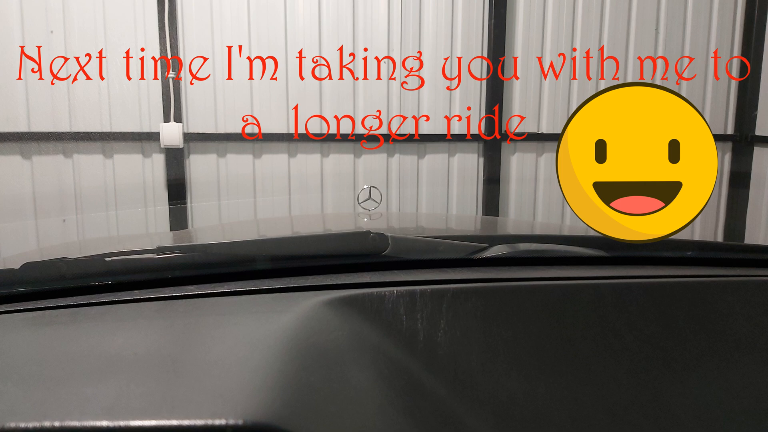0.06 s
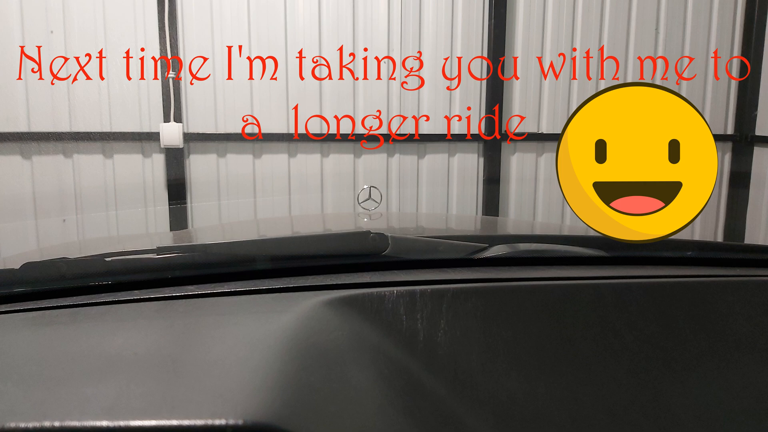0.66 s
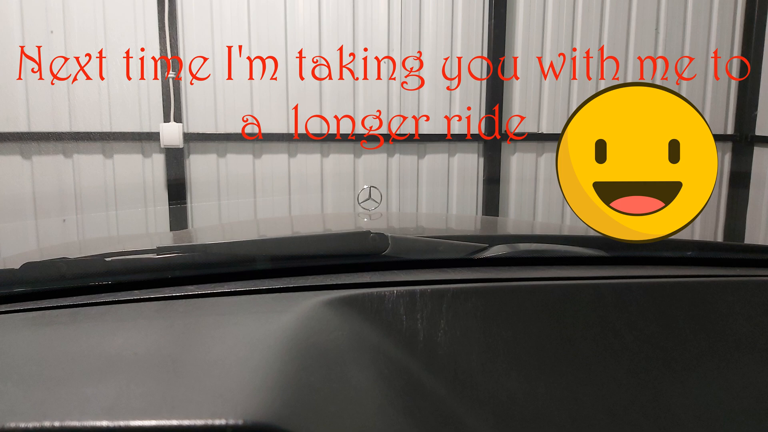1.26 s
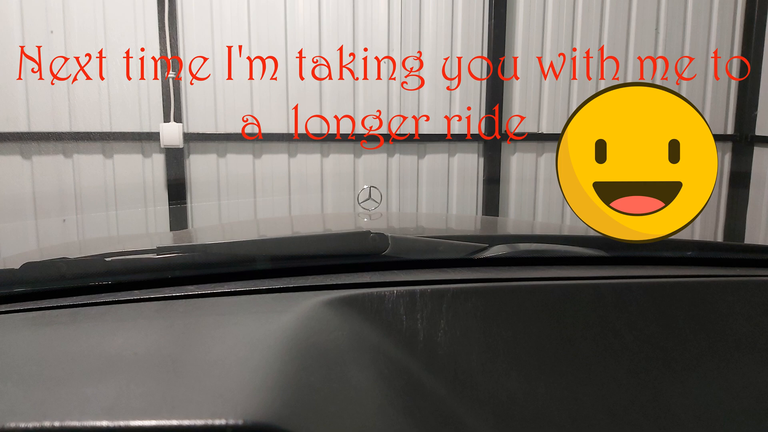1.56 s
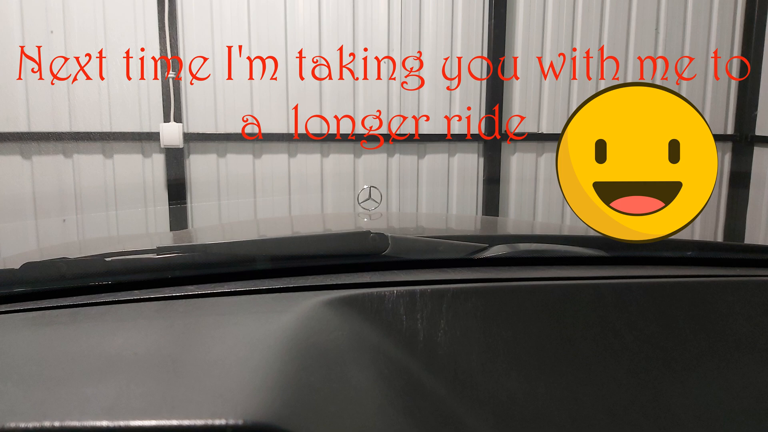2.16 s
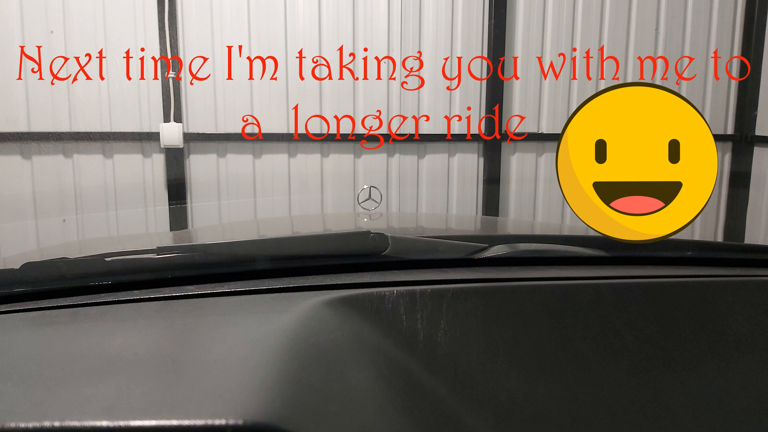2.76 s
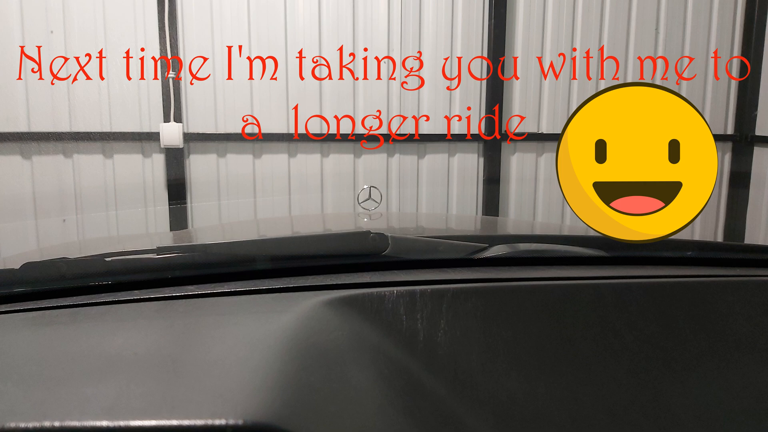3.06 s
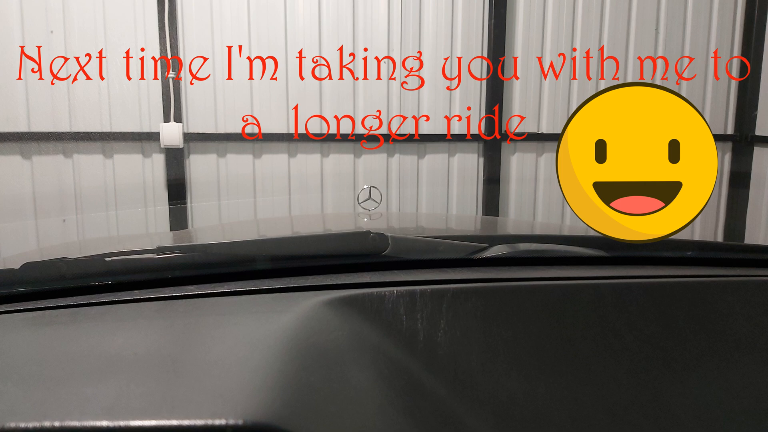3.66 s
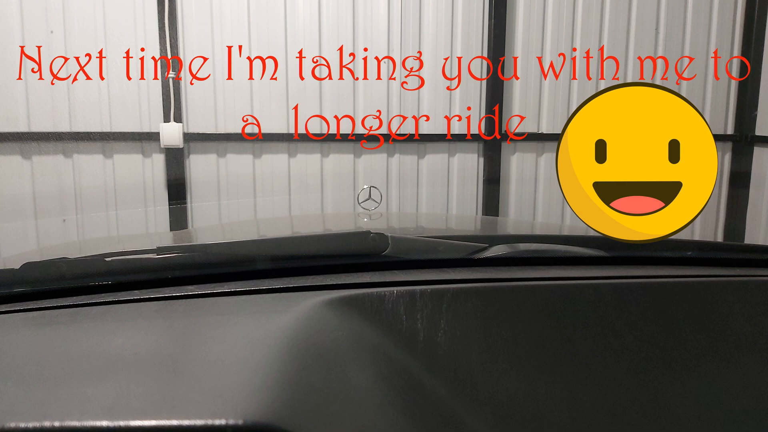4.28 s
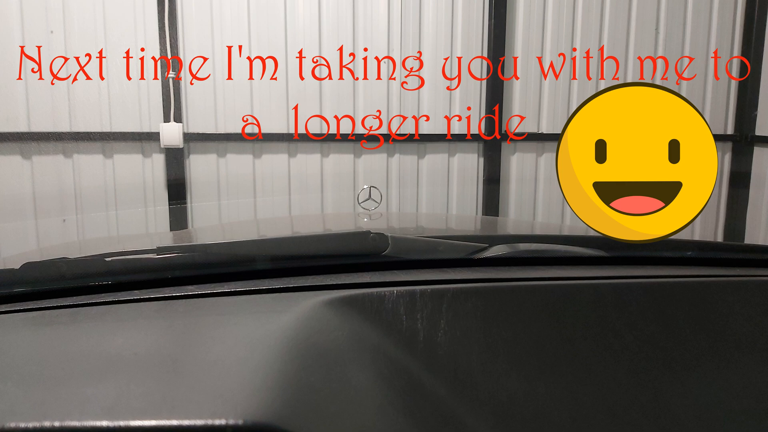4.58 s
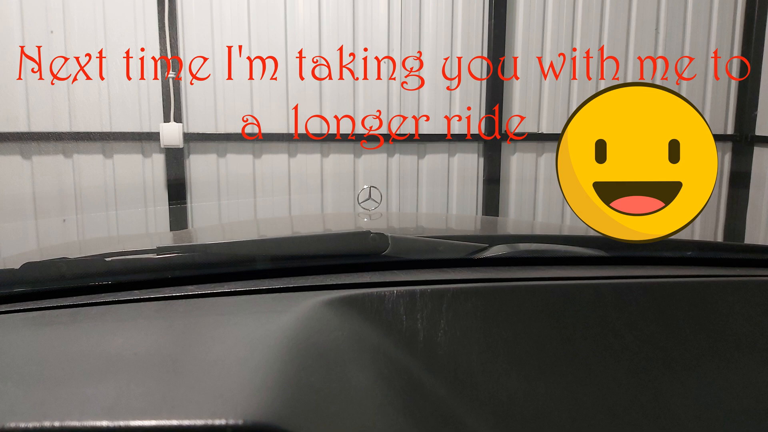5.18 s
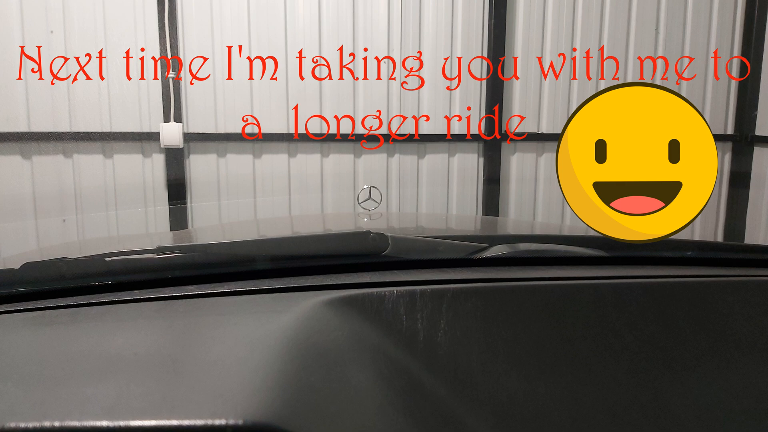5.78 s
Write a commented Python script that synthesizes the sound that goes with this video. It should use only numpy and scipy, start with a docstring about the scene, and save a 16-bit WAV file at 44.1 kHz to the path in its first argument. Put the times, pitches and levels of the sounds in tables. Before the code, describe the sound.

A petrol engine idles with a deep, uneven rumble, heard from inside a car parked in a garage. A fan hums and air hisses softly from the vents. Close to the microphone, plastic controls snap sharply and give a short rasp, then keys jingle faintly before a busy run of clicks and rubbing. The engine stumbles on alone, and after a few more clicks and soft thumps it shudders and dies away.

```python
"""An uneven petrol idle booms in the cabin of a car parked in a garage; a fan hums under rushing air.
The engine's speed hunts, and its low orders, harmonics of the crankshaft's rotation, sag at each misfire.
Close by, plastic controls and keys are handled: impacts ring their modes as clicks and jingles,
stick-slip friction rasps, and the small cabin reflects the sounds. Near the end the engine dies away."""
import sys
import numpy as np
from scipy import signal
from scipy.fft import rfft, irfft
from scipy.io import wavfile

SR = 44100
rng = np.random.default_rng(int(sys.argv[2]) if len(sys.argv) > 2 else 0)


def output_pcm(signal):
    """Save a mono or channel-first signal as 16-bit PCM at the path in sys.argv[1].

    Samples are clipped to [-1, 1] before scaling.
    """
    pcm = np.clip(np.atleast_2d(signal).T, -1, 1) * 32767
    wavfile.write(sys.argv[1], SR, np.round(pcm).astype(np.int16))


N = 265878
T = np.arange(N) / SR
HZ = np.fft.rfftfreq(N, 1 / SR)

# hunting idle: t/s, crankshaft rate/Hz
CRANK_SPEED = [(0.0, 24.2), (0.12, 24.1), (0.3, 25.4), (0.55, 25.4), (0.73, 24.1), (1.05, 25.3),
               (1.5, 25.5), (1.63, 24.3), (1.82, 26.3), (2.0, 26.0), (2.15, 24.9), (2.85, 24.6),
               (3.18, 23.7), (3.56, 24.9), (4.45, 26.2), (5.12, 25.5), (5.5, 24.3), (6.03, 24.4)]
# misfires: t/s, length/s, sag of the boom/dB, sag of the second order/dB
MISFIRE_SAGS = [(0.43, 0.12, 1.5, -4.5), (0.537, 0.079, 10.5, 20), (0.646, 0.03, 28, 2),
                (1.036, 0.032, 11, 13), (1.21, 0.18, 5.5, -2), (1.502, 0.045, 7, -7), (1.616, 0.047, 2, 4),
                (1.797, 0.062, 5, 0), (1.908, 0.029, 30, 5), (2.048, 0.055, 15, 5), (2.77, 0.14, 2.5, 11),
                (3.106, 0.06, 4, 6), (3.573, 0.062, 26, 11), (4.08, 0.065, 7, -1), (4.234, .05, 6.5, -1),
                (4.355, .04, 13, 2), (4.47, 0.018, 15, 3), (4.62, 0.18, 5, 2.5), (4.896, 0.085, 7, 8),
                (5.062, 0.061, 13, -1), (5.256, 0.04, 32, 21)]
# jolts as the engine runs down: t/s, lift/dB
JOLTS = [(5.595, 2.5), (5.655, 4.5), (5.73, 2), (5.82, 5.5)]
# spectrum of the body's rumble, and a ceiling on it: f/Hz, level/dB
BODY_SPECTRUM = [(18, -38.5), (30, -17), (64, -1), (80, 0), (94, 2.5), (103, -13), (146, -13.5),
                 (205, -21.5), (357, -24.5), (417, -31), (547, -43.5), (640, -42.5), (697, -33.5),
                 (770, -37.5), (900, -40.5), (1170, -74), (1980, -120)]
BODY_CEILING = [(30, -6.5), (90, -13), (140, -12.5), (900, -21.0)]
# panel and cavity resonances: f/Hz, width/Hz, gain/dB
PANEL_MODES = [(100, 9.6, 5), (140.86, 5.3, 10.5), (253.4, 9.2, 7.5), (287.3, 17, 9.5), (323, 12, 7),
               (356.8, 12, 11.5)]
# likeness of the two channels in the diffuse field: f/Hz, correlation
FIELD_CORRELATION = [(30, 1), (125, 1), (250, 0.67), (500, 0.58), (1000, 0.076), (2000, 0), (16000, 0)]
# balance of the diffuse field: f/Hz, left minus right/dB
FIELD_BALANCE = [(60, 8.5), (110, 2.5), (200, -4), (380, -3), (700, -4.5), (1290, 3), (2380, 3.5),
                 (4400, 0.5), (8120, -0.5), (15000, -4.5)]
# spectra of engine-bay roar, vent hiss, vent whirr and microphone noise: f/Hz, level/dB
ROAR_SPECTRUM = [(240, -26), (400, -4), (484, -0.5), (644, -12), (693, -4), (770, -15), (941, -7),
                 (1290, -18.5), (1450, -14.5), (1850, -16), (2440, -29.5), (4360, -38), (5000, -47.5),
                 (6500, -85.5), (11000, -120)]
HISS_SPECTRUM = [(1000, -7.5), (2000, 9.5), (3200, -1), (4200, -1), (6000, -2), (7800, 1), (9500, -8.5),
                 (12000, -12), (16000, -16)]
WHIRR_SPECTRUM = [(900, -15.5), (1800, 1), (2500, -4.5), (3300, -11), (4500, -8), (6000, -15.5),
                  (9000, -35.5)]
FLOOR_SPECTRUM = [(100, -3.5), (5000, -7), (9000, -7), (12000, 2.5), (16000, -1.5)]
# air through the vents: t/s, hiss level/dB, relative whirr level/dB
VENT_LEVELS = [(0, -59, -52), (0.25, -59.5, -53), (0.85, -59, -66), (1.2, -53.5, -63.5), (2.05, -58.5, -62),
               (3.0, -56, -66), (3.7, -65.5, -73), (5.6, -67, -69.5), (6.03, -85, -75.5)]
# duct resonances: f/Hz, width/Hz, gain/dB
DUCT_MODES = [(2850, 110, 7.5), (3045, 38, 17), (3360, 63, 11), (3684, 100, 10.5), (4300, 150, 4)]
# course of the fan's hum: t/s, gain/dB
FAN_GAIN = [(0, 6), (0.6, 3), (1.2, -4.5), (2.0, 1.5), (3.0, -0.5), (4.0, -2.5), (5.2, -6.5), (5.6, -10),
            (6.03, -44)]
# fan tones: multiple of the shaft rate, level/dB
FAN_HARMONICS = [(3, -52), (4, -47.5), (6, -56.5), (7, -50), (8, -61), (10, -59), (12, -61)]
# thin squeak: t/s, f/Hz, relative level/dB
SQUEAK_GLIDE = [(0.17, 10700, -78), (0.2, 11200, -63), (0.22, 11300, -65), (0.24, 10600, -60),
                (0.27, 10650, -64), (0.3, 10500, -76), (0.37, 9500, -70), (0.42, 8800, -84)]
# close snaps: t/s, peak level/dB, left minus right/dB, tilt/(dB per octave)
SNAP_EVENTS = [(0.555, -27, -15, 7), (0.577, -41, -3, 14), (0.613, -17, -20, 13), (0.623, -16, -13, 16),
               (0.641, -4, -24, 19), (0.6543, -8, -17, 3), (0.6589, 3, -22, 0), (0.6695, -23, -3, 10),
               (0.677, -14, -7, 15), (0.686, -26, -2, 9), (0.697, -20, 2, 16)]
# rubs of plastic: peak t/s, level/dB, length/s
RUB_STROKES = [(0.662, -36.5, 0.24), (2.246, -51, 0.34), (2.434, -27, 0.045), (2.562, -40, 0.35),
               (2.866, -34.5, 0.35)]
# spectra of snaps, rubbing, rasping and scraping keys: f/Hz, level/dB
SNAP_SPECTRUM = [(100, 1), (600, 6), (1800, 6), (3000, 1), (4500, 0), (6500, -0.5), (8500, -10),
                 (16000, -17)]
RUB_SPECTRUM = [(400, 9), (1200, 8), (2500, 13), (4500, 2), (8000, -4), (11000, 0), (16000, -8)]
RASP_SPECTRUM = [(200, 3.5), (600, 6.5), (1200, -3), (2000, 0.5), (3000, 3.5), (4500, -7.5), (8000, -17.5),
                 (10000, -25), (16000, -29)]
KEY_SPECTRUM = [(500, -41), (2500, 12), (4000, 1), (6000, 3.5), (8500, -1), (11000, -21), (16000, -13)]
# clicks: t/s, relative level/dB, tilt/(dB per octave), low mode f/Hz, high mode f/Hz, left minus right/dB
CLICK_EVENTS = [(0.674, -30.5, -0.5, 1800, 8000, -14), (0.921, -21.5, 0.2, 2230, 7100, 3.5),
                (1.159, -32, -7, 1910, 4130, 13), (1.799, -39.5, 3.5, 1080, 6950, 11),
                (1.84, -22, -4, 1400, 2300, 7), (1.937, -32, -5, 1400, 4300, 9),
                (2.199, -28, 1.5, 1420, 8000, 9), (2.401, -27, -2, 2200, 4750, 5),
                (2.418, -24, 3.5, 2570, 4960, 12), (2.425, -15, -1.5, 1300, 4260, 5.5),
                (2.439, -16, -1.5, 1890, 6500, 3.5), (2.461, -40, -9, 1540, 4550, 3),
                (2.495, -37, 10, 1120, 4000, 9), (2.551, -12, 7, 2036, 5850, 7),
                (2.554, -15, 7.5, 1670, 8180, 8), (2.573, -27, -5.5, 3320, 4800, 5),
                (2.591, -17.5, 7, 3050, 4800, 5), (2.629, -22.5, 2, 2000, 7400, 4.5),
                (2.754, -24, 8, 2200, 7800, 9.5), (2.798, -12, 1.5, 2550, 2980, 6.5),
                (2.837, -17.5, -2, 1980, 4340, 3), (2.844, -16.5, 0, 1410, 4500, 7),
                (2.872, -21, -0.5, 2350, 4500, 10), (2.927, -13.5, 6.5, 2290, 4260, 6),
                (3.02, -24, 6, 2300, 6060, 6.5), (3.058, -37.5, -8, 1130, 4530, 4),
                (3.181, -23, 5, 2250, 5710, 6), (3.424, -51, 16, 1820, 10600, 10),
                (3.45, -47, 13, 1140, 9860, 6), (5.432, -28.5, 1.5, 2220, 6310, 7),
                (5.442, -26, 4.5, 2060, 6310, 7), (5.49, -29, 4.5, 1570, 7600, 11),
                (5.503, -26, 1.5, 1590, 6260, 2.5), (5.561, -42, -1.5, 1460, 6190, 8),
                (5.618, -43, -6.5, 1820, 6370, 7), (5.769, -56, -15, 774, 1530, 9),
                (5.886, -49, -5, 1700, 3200, 9.5)]
# knock, clack, tick and fizz bands of a click: lower f/Hz, upper f/Hz
CLICK_BAND_EDGES = [(500, 1300), (1300, 3500), (3500, 9000), (9000, 16000)]
# balance added to every click: f/Hz, left minus right/dB
CLICK_BALANCE = [(500, -11.5), (1300, -0.5), (3000, 0), (8000, -6.5), (13000, -10.5)]
# resonances of the plastic: f/Hz, width/Hz, gain/dB
PLASTIC_MODES = [(935, 490, 8.5), (1420, 37, 4), (1800, 280, 5), (2545, 900, 5.5), (3340, 1800, -6.5),
                 (4280, 220, 3), (6020, 500, 0.5), (6950, 300, 1), (8050, 5400, 1.5), (12200, 800, 5),
                 (15900, 4000, -3)]
# sliding control: t/s, level/dB, slip rate/Hz
SLIDE = [(0.987, -30, 122), (1.02, -32, 130), (1.04, -31.5, 85), (1.076, -32, 70), (1.095, -42, 23)]
# dull thumps in the trim: t/s, level/dB
THUMP_EVENTS = [(1.838, -22), (4.616, -35.5), (5.497, -29.5), (5.545, -27), (5.769, -44)]
# modes of the trim: f/Hz, gain/dB, T60/s
TRIM_RESONANCES = [(114, 5.5, 0.32), (205, 3.5, 0.068), (327, 0.5, 0.043), (547, -21, 0.12),
                   (719, -10, 0.13)]
# keys touching: t/s, level/dB
KEY_CONTACTS = [(2.104, -57), (2.146, -49.5), (2.199, -52), (2.222, -49), (2.253, -54), (2.287, -51.5),
                (2.307, -51.5), (2.352, -56)]
# resonances of the keys: f/Hz, width/Hz, gain/dB
METAL_MODES = [(4260, 76, 22), (4890, 240, 14.5), (7300, 110, 8), (8400, 810, 10), (9400, 300, 3)]
# faint whines: t/s, length/s, f/Hz, level/dB
WHINE_EVENTS = [(4.29, .09, 942, -50), (4.28, .11, 1420, -55), (5.44, .1, 1420, -49)]


def amp(db):
    """Amplitude ratio of a level in decibels."""
    return 10 ** (np.asarray(db) / 20)


def unit_rms(x):
    """Normalisation to unit mean power."""
    return x / np.sqrt(np.mean(x ** 2) + 1e-20)


def curves(rows):
    """Linear interpolation of each column in time."""
    times, *columns = np.transpose(rows)
    return [np.interp(T, times, column) for column in columns]


def spectrum(points, hz=HZ):
    """Linear interpolation on a logarithmic frequency axis."""
    f, value = np.transpose(points)
    return np.interp(np.log(hz + 1), np.log(f + 1), value)


def resonances(modes, hz=HZ):
    """Gain in dB of a set of bell-shaped resonance peaks."""
    return sum(db / (1 + (2 * (hz - centre) / width) ** 2) for centre, width, db in modes)


def colour(x, db):
    """Minimum-phase filtering: folding the cepstrum makes the given dB response causal."""
    size = x.shape[-1]
    cepstrum = irfft(db * np.log(10) / 20, size)
    cepstrum[1:size // 2] *= 2
    cepstrum[size // 2 + 1:] = 0
    return irfft(rfft(x) * np.exp(rfft(cepstrum)), size)


def drift(rate_hz):
    """Random fluctuation: low-pass noise of unit rms."""
    return unit_rms(irfft(rfft(rng.standard_normal(N)) * np.exp(-(HZ / rate_hz) ** 2), N))


def bump(s, length):
    """Gaussian pulse of height 1, its length taken at half height."""
    return np.exp2(-(2 * (T - s) / length) ** 2)


def pan(db):
    """Left and right gains for a level difference."""
    return amp(np.array([[db], [-db]]) / 2)


def add(mix, s, sound):
    """Superposition of a sound from time s on."""
    part = mix[:, round(s * SR):][:, :sound.shape[1]]
    part += sound[:, :part.shape[1]]


def diffuse_noise():
    """A diffuse field is alike at two points for long wavelengths and unrelated for short ones."""
    left, independent = rfft(rng.standard_normal((2, N)))
    correlation = np.clip(spectrum(FIELD_CORRELATION), -1, 1)
    right = correlation * left + np.sqrt(1 - correlation ** 2) * independent
    balance_db = spectrum(FIELD_BALANCE)
    return irfft(np.array([left, right]) * amp(np.array([balance_db, -balance_db]) / 2), N)


def cabin(direct=0.98, early_t60=0.21, late_t60=0.32, late_db=-17):
    """Impulse response: a direct burst, early reflections off glass and dash, and a faint tail."""
    t = np.arange(SR // 4) / SR
    taps = rng.standard_normal((2, len(t))) * (rng.random((2, len(t))) < .25)
    echoes = taps * (amp(-60 * t / early_t60) + amp(late_db - 60 * t / late_t60))
    contact = (rng.standard_normal(len(t)) + .6 * rng.standard_normal((2, len(t)))) * np.exp(-t / .0017)
    path = echoes / np.linalg.norm(echoes[0]) + direct * contact / np.linalg.norm(contact[0])
    return path * (1 - np.exp(-t / 0.00043))  # the contact takes a moment to build


def scattered(x, paths=8):
    """Multipath propagation: a moving contact is heard by ever different routes through the cabin."""
    route = rng.integers(0, paths, N // 128 + 1).repeat(128)[:N]
    return sum(signal.oaconvolve((x * (route == k))[None], cabin(direct=0.49, early_t60=0.09), axes=1)
               for k in range(paths))[:, :N]


def misfire_sag():
    """Attenuation of the boom in dB as misfires weaken its excitation."""
    return sum(db * bump(s, length) for s, length, db, _ in MISFIRE_SAGS)


def run_down(start_s=5.592, db_per_s=44, depth_db=12):
    """Attenuation in dB of the dying engine: exponential decay to a floor."""
    return np.clip((T - start_s) * db_per_s, 0, depth_db)


def shudder(length_s=0.027):
    """Amplitude modulation in dB by the engine's last jolts."""
    return sum(db * bump(s, length_s) for s, db in JOLTS)


def engine_orders(speed, turns, waver_db=1.53, waver_hz=6, stumble=0.83, falter_s=5.26):
    """Periodic forcing gives harmonics of the rotation; unequal cylinders add a lope of half orders."""
    angle = 2 * np.pi * turns
    boom_sag = misfire_sag()
    second_sag = sum(db * bump(s, length) for s, length, _, db in MISFIRE_SAGS)
    falter_db = 11 * np.clip((T - falter_s) / .05, 0, 1)  # the boom stays weak after the last misfire
    first_db = -35 + 7 * (speed - 26.1)  # the shake grows with speed
    second_db = -30.5 - second_sag + waver_db * drift(waver_hz)
    boom_db = -23.5 - boom_sag - falter_db + waver_db * drift(waver_hz)
    shake = amp(first_db) * np.sin(angle) + amp(second_db) * np.sin(2 * angle)
    boom = -amp(boom_db) * np.sin(3 * angle)  # cabin resonance inverts the third order
    sixth = amp(-46.5 - boom_sag / 2) * np.sin(6 * angle)
    lope = np.zeros(N)
    for k in (3, 5, 7, 9):
        strength = amp(second_db - 12 - 0.57 * k) * (1 + stumble * drift(3.8))
        lope += strength * np.cos(k * angle / 2 + rng.uniform(0, 2 * np.pi))
    return np.sqrt(2) * (shake + boom + sixth + lope) * amp(shudder() - run_down()) * pan(-2.4)


def block_knock(turns, throb=0.15, uneven=0.67, knock_db=-8, ease_db_per_s=0.16):
    """Forced vibration: three uneven firings a turn and a rumble drive the body panels' modes."""
    level_db = -30 + shudder() - 0.13 * misfire_sag() - ease_db_per_s * T + drift(12) - run_down()
    beats = np.diff(np.floor(3 * turns), prepend=0)
    firings = beats * (1 + uneven * rng.standard_normal(N))
    rumble = diffuse_noise() * (1 + throb * np.cos(2 * np.pi * turns))
    response_db = np.minimum(spectrum(BODY_SPECTRUM), spectrum(BODY_CEILING)) + resonances(PANEL_MODES)
    body = colour(unit_rms(rumble) + amp(knock_db) * unit_rms(firings), response_db)
    return amp(level_db) * unit_rms(body)


def bay_roar(turns, throb=0.068, flutter_db=0.5, ease_db_per_s=0.74):
    """Broadband noise of the engine bay, amplitude-modulated once a turn."""
    level_db = -42 - ease_db_per_s * T - 1.2 * run_down()
    pulsing = 1 + throb * np.cos(2 * np.pi * turns)
    roar = unit_rms(colour(diffuse_noise() * pulsing, spectrum(ROAR_SPECTRUM)))
    return roar * amp(level_db + flutter_db * drift(30))


def vents():
    """Flow noise hisses from the vents; duct resonances colour a part of it into a whirr."""
    hiss_db, whirr_db = curves(VENT_LEVELS)
    hiss = unit_rms(colour(diffuse_noise(), spectrum(HISS_SPECTRUM)))
    whirr = unit_rms(colour(diffuse_noise(), spectrum(WHIRR_SPECTRUM) + resonances(DUCT_MODES)))
    return hiss * amp(hiss_db) + whirr * amp(whirr_db + 2.5)


def noise_floor(level_db=-67.5):
    """Microphone self-noise, uncorrelated between the channels."""
    return amp(level_db) * unit_rms(colour(rng.standard_normal((2, N)), spectrum(FLOOR_SPECTRUM)))


def fan(shaft_hz=98.1, waver=0.00511, flicker_db=3.36):
    """A rotor radiates tones at harmonics of its wavering shaft rate."""
    gain_db, = curves(FAN_GAIN)
    angle = 2 * np.pi * np.cumsum(shaft_hz * (1 + waver * drift(4.69))) / SR
    tones = sum(amp(db + flicker_db * drift(2.1)) * np.cos(k * angle + .5 * rng.standard_normal((2, 1)))
                for k, db in FAN_HARMONICS)
    return amp(gain_db) * tones


def squeak(gap_hz=1300, lower_db=-6, roughness=.012):
    """Two thin gliding tones, roughened by random frequency modulation and smeared by reflections."""
    hz, db = curves(SQUEAK_GLIDE)
    angle = 2 * np.pi * np.cumsum(hz * (1 + roughness * drift(1500))) / SR
    tones = np.sin(angle) + amp(lower_db) * np.sin(angle - 2 * np.pi * gap_hz * T)
    sounding = (T > SQUEAK_GLIDE[0][0]) & (T < SQUEAK_GLIDE[-1][0])
    return signal.fftconvolve((tones * amp(db + 7) * sounding)[None], cabin(), axes=1)[:, :N]


def snaps(echo=0.25):
    """Impulses close to the microphone, where direct sound outweighs the reflections."""
    out = np.zeros((2, N))
    for s, db, side_db, tilt_db in SNAP_EVENTS:
        path = echo * cabin(direct=.1, early_t60=0.045)
        path[:, :1] += pan(side_db)
        bins = np.fft.rfftfreq(path.shape[1], 1 / SR)
        spike = colour(path, spectrum(SNAP_SPECTRUM, bins) + tilt_db * np.log2(1 + bins / 1000))
        add(out, s, amp(db) * spike / abs(spike).max())
    return out


def rubbing(grains_per_s=1500, edge_drop_db=24.5):
    """Friction noise: rubbing plastic sheds tiny random impulses that swell and fade with each stroke."""
    pressure = sum(amp(db - edge_drop_db * abs(T - s) / (length / 2)) for s, db, length in RUB_STROKES)
    impulses = (rng.random(N) < grains_per_s / SR) * rng.choice([-1, 1], N)
    grains = impulses * amp(4 * np.minimum(rng.exponential(1, N), 4))  # sizes spread over 16 dB
    rub = unit_rms(colour(grains, spectrum(RUB_SPECTRUM))) * pressure
    return scattered(rub) * pan(2)


def clicks(band_levels_db=(-23, -14, -17, -29), unpitched_db=-8, pivot_hz=3370):
    """Impact excitation: each click rings the plastic and two damped modes of its own, then echoes."""
    out = np.zeros((2, N))
    filters = [signal.butter(3, band, "bandpass", fs=SR, output="sos") for band in CLICK_BAND_EDGES]
    for s, db, tilt_db, low_hz, high_hz, side_db in CLICK_EVENTS:
        path = cabin(direct=0.56, early_t60=0.1, late_t60=0.12, late_db=-14)
        bins = np.fft.rfftfreq(path.shape[1], 1 / SR)
        # the higher mode is wider, so it decays faster
        modes = sum(1 / (1 + 2j * (bins - hz) / width) for hz, width in ((low_hz, 90), (high_hz, 220)))
        modes_db = 20 * np.log10(abs(amp(unpitched_db) + modes) + 1e-6)
        ring = colour(path, resonances(PLASTIC_MODES, bins) + modes_db)
        for sos, band, band_db in zip(filters, CLICK_BAND_EDGES, band_levels_db):
            part = signal.sosfilt(sos, ring)
            part /= np.std(part[:, :SR // 50])
            sides = pan(side_db + spectrum(CLICK_BALANCE, np.mean(band)))
            octaves = np.mean(np.log2(band)) - np.log2(pivot_hz)
            add(out, s, part * amp(db + band_db + tilt_db * octaves) * sides)
    return out


def rasp(slip_decay_s=.0013):
    """Stick-slip friction: a sliding control releases a burst of noise at each slip."""
    level_db, slip_hz = curves(SLIDE)
    sliding = (T > SLIDE[0][0]) & (T < SLIDE[-1][0])
    since_slip = np.cumsum(slip_hz * sliding) / SR % 1 / slip_hz
    slips = (.22 + np.exp(-since_slip / slip_decay_s)) * rng.standard_normal(N) * sliding
    ring = colour(slips, spectrum(RASP_SPECTRUM) + .5 * resonances(PLASTIC_MODES))
    direct = unit_rms(ring) * np.sqrt(sliding.mean()) * amp(level_db)
    return (.75 * direct + .6 * scattered(direct)) * pan(4)


def thumps(spread_db=2.5):
    """Free vibration: each thump rings the trim's damped modes in a new mix, echoed by the cabin."""
    out, t = np.zeros((2, N)), np.arange(SR // 3) / SR
    for s, db in THUMP_EVENTS:
        for hz, mode_db, t60 in TRIM_RESONANCES:
            envelope = amp(db + mode_db + spread_db * rng.standard_normal((2, 1)) - 60 * t / t60)
            add(out, s, envelope * np.sin(2 * np.pi * hz * t))
    return out + 0.5 * signal.fftconvolve(out, cabin(), axes=1)[:, :N]


def keys(scrape_t60=0.11):
    """Keys scrape across each other in short bursts that excite the metal's resonances."""
    out, t = np.zeros((2, N)), np.arange(SR // 5) / SR
    bins = np.fft.rfftfreq(len(t), 1 / SR)
    for s, db in KEY_CONTACTS:
        scrape = rng.standard_normal((2, len(t))) ** 3 * amp(-60 * t / scrape_t60)
        ring = colour(scrape, spectrum(KEY_SPECTRUM, bins) + resonances(METAL_MODES, bins))
        add(out, s, amp(db) * ring / np.std(ring[:, :SR // 50]) * pan(4.1))
    return out


def whines():
    """Brief pure tones swell and fade under a half-sine envelope."""
    out = np.zeros((2, N))
    for s, length, hz, db in WHINE_EVENTS:
        t = np.arange(0, length, 1 / SR)
        add(out, s, amp(db) * np.sin(2 * np.pi * hz * t) * np.sin(np.pi * t / length) * pan(2.9))
    return out


def scene():
    """Superposition: one crankshaft times boom, knock and roar; air and handling sounds add to them."""
    speed, = curves(CRANK_SPEED)
    turns = np.cumsum(speed) / SR
    engine = engine_orders(speed, turns) + block_knock(turns) + bay_roar(turns)
    background = engine + vents() + noise_floor() + fan()
    return background + squeak() + snaps() + rubbing() + clicks() + rasp() + thumps() + keys() + whines()


def record(dry):
    """Band limiting by a linear-phase low-pass filter at 16.2 kHz."""
    low_pass = signal.firwin(401, 16200, window=("kaiser", 9), fs=SR)
    return signal.oaconvolve(dry, low_pass[None], "same")


dry = scene()
out = record(dry)
output_pcm(out)
```